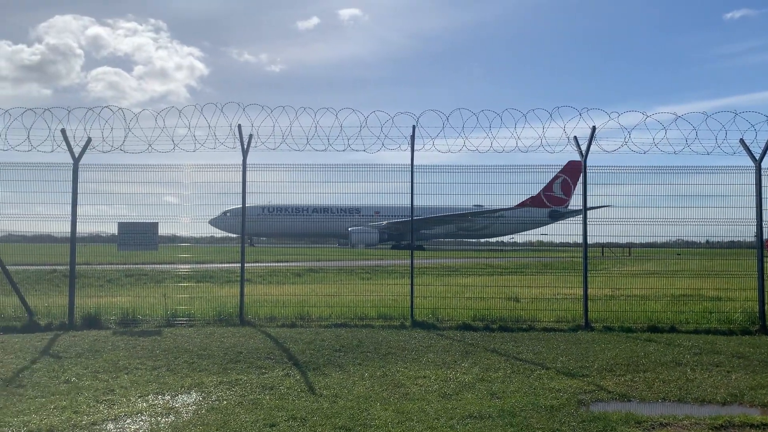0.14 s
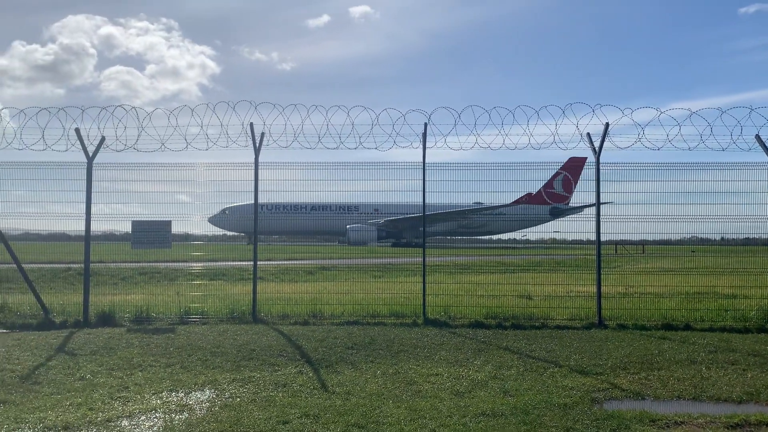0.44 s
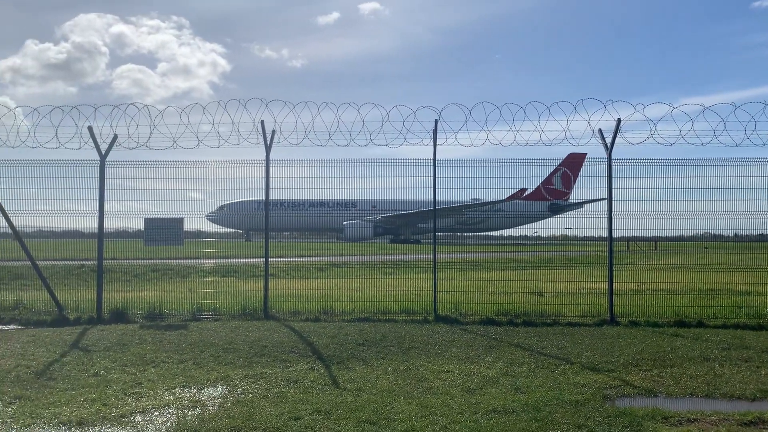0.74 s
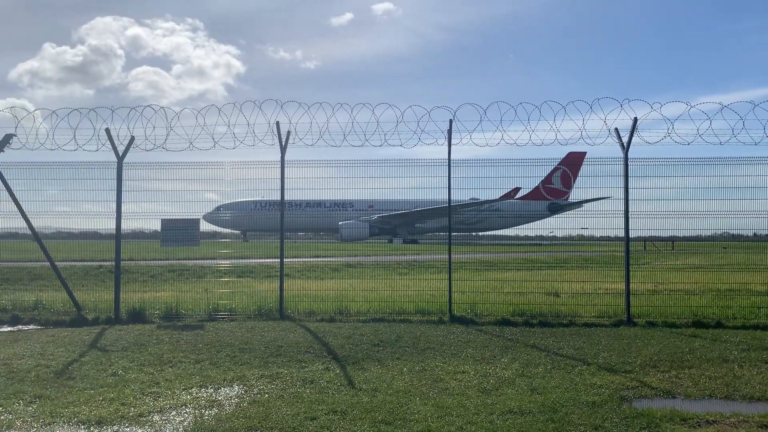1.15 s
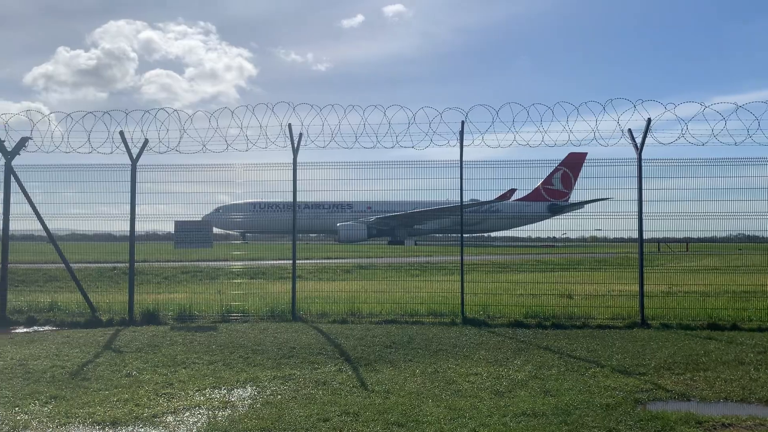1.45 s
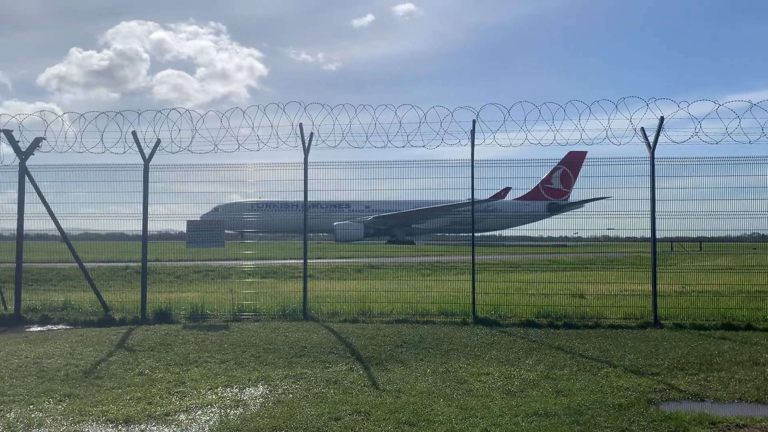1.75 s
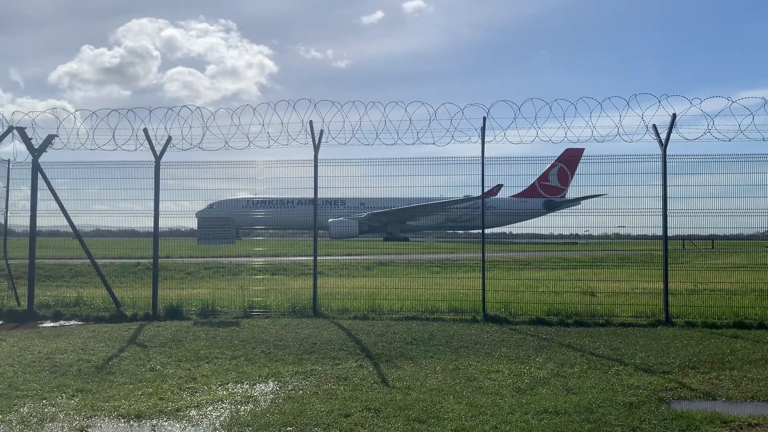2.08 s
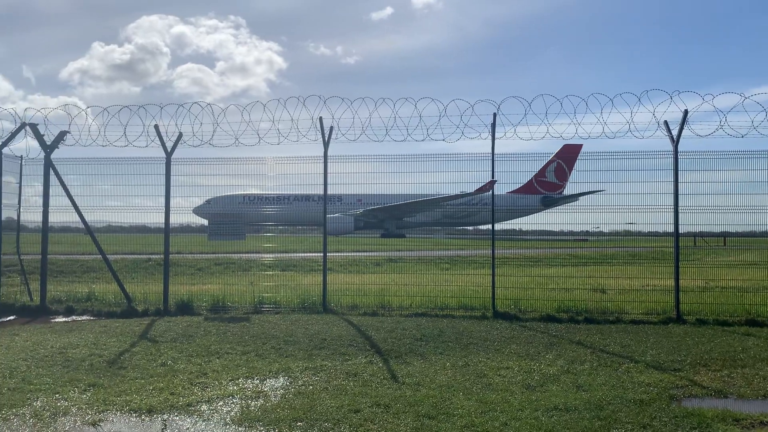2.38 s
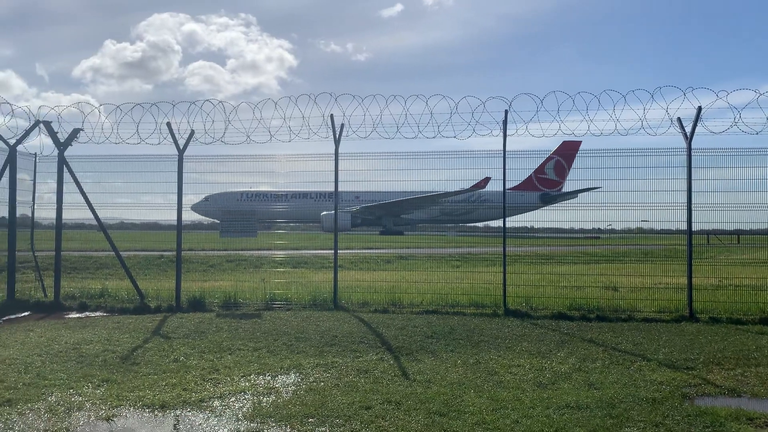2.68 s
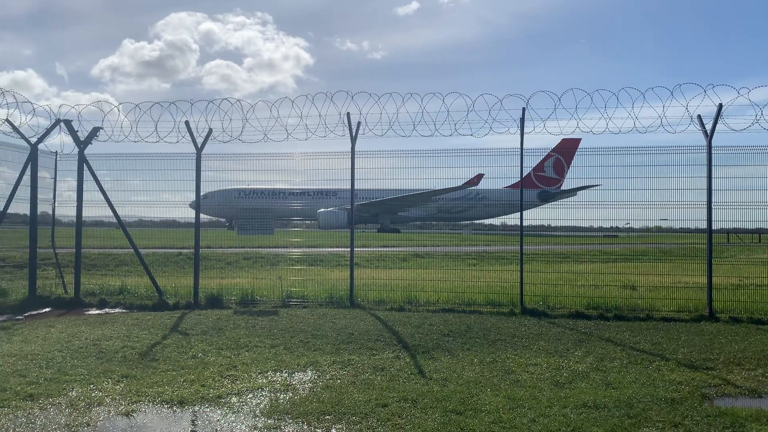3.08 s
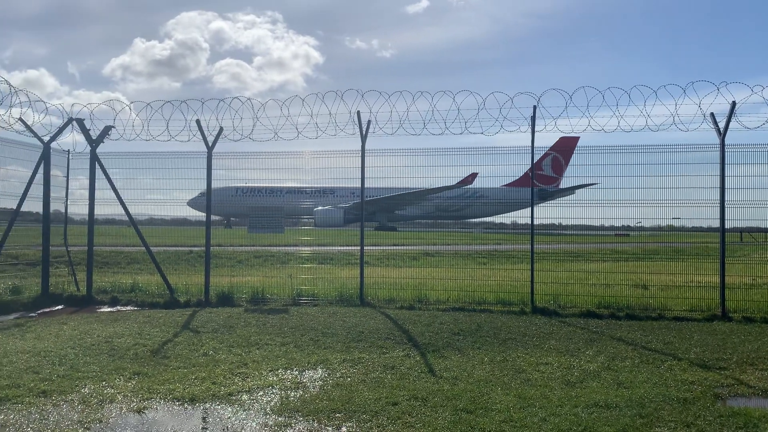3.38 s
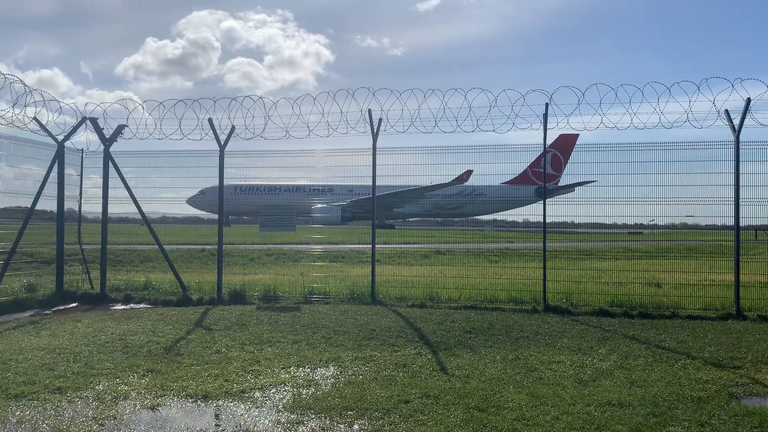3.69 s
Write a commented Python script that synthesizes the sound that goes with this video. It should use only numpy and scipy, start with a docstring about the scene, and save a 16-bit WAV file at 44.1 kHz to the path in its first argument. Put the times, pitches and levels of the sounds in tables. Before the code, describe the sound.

An airliner taxis across an open airfield, its distant jet engines giving a steady low rumble, a roar and thin wavering whines. Wind buffets the microphone in short puffs, growing busier toward the end as gusts hiss through grass.

```python
"""A windy airfield: an airliner taxis past at a distance, heard through two close microphone ports.
Its engines give a low exhaust rumble with drones, a mid jet roar and thin blade whines that fade
in and out in the moving air. Eddies buffet the ports in short puffs, flurries and low shoves.
Gusts hiss in the grass and the fence, most of all near the end."""
import sys
import numpy as np
from scipy import signal
from scipy.fft import rfft, irfft
from scipy.io import wavfile
from scipy.ndimage import uniform_filter1d

SR = 44100
rng = np.random.default_rng(int(sys.argv[2]) if len(sys.argv) > 2 else 0)


def waveform_to_disk(signal):
    """Save audio, clipped to [-1, 1], as 16-bit WAV at the path in sys.argv[1]."""
    frames = np.transpose(np.atleast_2d(signal))
    scaled = np.clip(frames, -1, 1) * 32767
    samples = np.round(scaled).astype(np.int16)
    wavfile.write(sys.argv[1], SR, samples)


N = 168903
T = np.arange(N) / SR

# Port pair. Each row: frequency in Hz, coherence, left lead in radians, left minus right in dB.
PORT_RESPONSE = [(170, 0.94, -1.5, -2.5), (332, 0.96, 1.62, 0.5), (520, 0.39, -1, -.5),
                 (930, 0.95, 0.77, -1.5), (1480, 0.9, 0.1, -1.7), (2720, 1, 1.12, -1.5),
                 (3170, .15, 1, 0.5), (4420, 0.66, 1.1, 0), (4760, 0.2, -3, -7), (5750, 0.9, -1.2, -1.5),
                 (7380, .72, -1.28, -3.5), (8380, 1, -3, 0.5), (11300, 0.6, -1, 0)]

# Noise spectra. Each row: frequency in Hz, relative density in dB.
WASH_SPECTRUM = [(300, -4), (600, -5), (740, -4), (830, 1), (900, -0.5), (1100, 0.5), (1500, -6),
                 (2600, -12), (3200, -21), (5000, -51.5)]
HISS_SPECTRUM = [(1500, -3), (3400, -6.5), (4450, 0), (4800, -3), (5150, 3.5), (5800, 3.5), (6800, -0.5),
                 (7400, 6), (7800, 2.5), (8180, 11.5), (8420, -23.5), (9300, -13.5), (10000, -11.5),
                 (11000, -42.5)]
GRASS_SPECTRUM = [(300, 11), (700, 2), (1500, 20), (3000, -22.5), (4500, 8.5), (5800, 12), (7000, -13),
                  (8300, -8), (10000, -39)]
BUFFET_SPECTRUM = [(100, -30), (200, -13.5), (300, 11), (420, -6.5), (600, -11), (900, -12), (2000, -50)]
FLURRY_SPECTRUM = [(120, -20), (230, 2), (330, 1), (450, -4.5), (560, -10.5), (720, -17.5), (1000, -23),
                   (2000, -56)]
RUMBLE_SPECTRUM = [(10, -45), (18, -36.5), (27, -24.5), (37, -16.5), (58, 1.5), (82, 0), (110, -4.5),
                   (124, -5), (138, -1), (162, 1.5), (190, -6), (280, -9.5), (325, -11.5), (380, -20.5),
                   (480, -36), (750, -45), (1500, -85)]
ROAR_SPECTRUM = [(200, -3.5), (500, -9), (740, -3.5), (830, -4.5), (900, -5.5), (1100, -3.5), (1400, -4.5),
                 (1720, 1), (1850, 2), (2050, 3), (2180, -1), (2450, -1.5), (2850, -1.5), (3050, -8),
                 (3300, -15.5), (4500, -18), (8000, -62.5)]

# Noise and tone envelopes. Each row: time in seconds, level in dB before any trim or fading.
WASH_DB = [(0, -59), (1.3, -47.5), (2.4, -42), (3.83, -41.5)]
HISS_DB = [(0.0, -54), (0.02, -57), (0.48, -57), (1.14, -52), (1.27, -55.5), (1.68, -57.5), (1.76, -55),
           (3.31, -52), (3.67, -49.5), (3.83, -49.5)]
BUFFET_DB = [(0, -34.5), (.8, -48.5), (1.3, -36.5), (2.3, -34), (2.8, -40.5), (3.35, -31.5), (3.65, -41),
             (3.83, -35)]
ROAR_DB = [(0, -34.5), (.17, -34.5), (.24, -33.5), (.6, -34.5), (.95, -35), (1.26, -35), (1.36, -36),
           (1.62, -37.5), (1.85, -36.5), (2.3, -36.5), (2.7, -36), (2.86, -38), (3, -37.5), (3.83, -38)]
UPPER_DRONE_DB = [(0, -44), (.14, -31), (.27, -50), (.5, -31.5), (.7, -41), (1.2, -35.5), (1.32, -38.5),
                  (1.47, -26), (1.58, -41), (2, -34.5), (2.2, -33), (2.4, -36.5), (2.68, -32.5), (3, -45.5),
                  (3.83, -34)]
FAN_DB = [(0, -49), (.07, -44), (.22, -52), (.35, -54.5), (.48, -51), (.6, -54), (.72, -49.5), (.82, -60),
          (.95, -56.5), (1.03, -53), (1.27, -50), (1.36, -53.5), (1.48, -50), (1.58, -61), (2.04, -57),
          (2.11, -47), (2.19, -57), (2.3, -51.5), (2.55, -56.5), (2.8, -57), (2.95, -62), (3.55, -66),
          (3.7, -57), (3.83, -58)]
FAN_RING_DB = [(0, -52), (.18, -45), (.27, -43), (.52, -46), (.6, -55), (.95, -46), (1.17, -46), (1.4, -58),
               (1.55, -44), (1.75, -55), (3.83, -58.5)]
TURBINE_DB = [(0, -63), (.8, -55), (1.7, -60.5), (2.3, -62), (3.35, -60), (3.83, -58)]

# Wind and whine swells. Each row: centre in seconds, sigma in seconds, crest level in dB.
GRASS_GUSTS = [(.71, .045, -41.5), (3.63, 0.048, -40.5), (3.79, 0.082, -42)]
EDDY_FLURRIES = [(.44, 0.029, -32), (2.54, .012, -28), (2.62, .012, -26), (2.838, 0.015, -22.5),
                 (3.122, 0.013, -25), (3.48, 0.0069, -23.5), (3.558, 0.01, -23), (3.615, 0.019, -21),
                 (3.69, 0.024, -27), (3.782, 0.0085, -28)]
TURBINE_WHINE_SWELLS = [(2.022, 0.028, -49), (2.202, .017, -48), (2.28, 0.021, -50), (2.421, 0.015, -46.5),
                        (2.544, 0.017, -47), (2.741, .022, -51.5), (2.882, .022, -47.5),
                        (2.999, 0.022, -49), (3.085, .021, -48.5), (3.19, 0.018, -50), (3.288, .018, -52),
                        (3.6, 0.022, -56), (3.747, 0.023, -49)]
# Large eddies. Each row: centre in seconds, sigma in seconds, crest level in dB, pitch in Hz.
LOW_SHOVES = [(.211, 0.011, -17, 89.9), (0.304, 0.0082, -22, 90), (.79, .025, -23.5, 70),
              (1.248, 0.0057, -17, 65), (2.552, 0.014, -18, 130), (2.644, 0.011, -16, 80),
              (2.825, 0.012, -15, 125), (2.905, 0.014, -17, 70), (2.959, 0.0079, -15.5, 105),
              (3.272, 0.01, -16.5, 60), (3.313, 0.011, -20.5, 55), (3.399, 0.024, -18.5, 140),
              (3.457, 0.0091, -13.5, 60), (3.535, 0.018, -17, 70), (3.646, 0.014, -19, 75),
              (3.717, 0.011, -16, 85)]
# Single eddies. Each row: peak time in seconds, peak in dB, starting pitch in Hz.
PORT_PUFFS = [(0.366, -14, 398), (.452, -22, 720), (.531, -24, 685), (0.767, -19, 575), (.785, -12.5, 327),
              (.867, -23, 704), (1.8508, -14, 987), (2.063, -15, 880), (2.611, -17, 590), (2.763, -23, 610),
              (3.14, -15.5, 510), (3.257, -17.5, 740), (3.622, -11, 448), (3.677, -19, 685)]
# Low engine drones. Each row: pitch in Hz, rms level in dB, fading in dB, wander as a share of pitch.
LOW_DRONES = [(81, -33, 3, .03), (101.4, -24.3, 2, .007)]
# Thin blade tones. Each row: pitch in Hz, start level in dB, end level in dB, left lead in radians.
BLADE_TONES = [(1529.5, -57, -53, .1), (1824, -47.5, -53.5, .5), (3228, -61.5, -70, -2),
               (4963, -68, -68, -2.2), (6278, -73, -72, -.9)]

HISS_TRIM_DB, ROAR_TRIM_DB, RUMBLE_DB = 7, 0.27, -19.5
PUFF_RISE_S, PUFF_SAG_S, PUFF_END_SHARE, PUFF_JITTER = .0035, .0038, 0.18, 0.16
UPPER_DRONE_HZ, FAN_HZ, FAN_RING_HZ, TURBINE_HZ = 310.5, 4062, 2235, 3645
LOW_CUT_HZ, MONO_BELOW_HZ, HIGH_CUT_HZ, FADE_S = 36.5, 327, 11300, .002


def amp(db):
    """Decibels to gain."""
    return 10 ** (np.asarray(db) / 20)


def unit(x):
    """Scales to rms 1."""
    return x / np.sqrt(np.mean(x ** 2) + 1e-20)


def curve(points):
    """Piecewise-linear curve in time."""
    return np.interp(T, *np.transpose(points))


def swells(table):
    """Gain curve: one Gaussian per row."""
    return sum(amp(db) * np.exp(-.5 * ((T - centre_s) / sigma_s) ** 2) for centre_s, sigma_s, db in table)


def lookup(points, hz, column=1):
    """Table column on a log-frequency axis."""
    table = np.transpose(points)
    return np.interp(np.log(hz + 1), np.log(table[0]), table[column])


def drift(rate_hz):
    """Slow random motion, soft-limited, rms 1."""
    hz = np.fft.rfftfreq(N, 1 / SR)
    slow = irfft(rfft(rng.standard_normal(N)) * (hz > 0) / (1 + (hz / rate_hz) ** 2), N)
    return unit(np.tanh(.5 * unit(slow)))


def air_noise(spectrum, patchy_db, size=1024, coherence_scale=1):
    """Coloured noise with drifting patches at the two ports, rms 1."""
    hz = np.fft.rfftfreq(size, 1 / SR)
    left_re, left_im, own_re, own_im, patches = rng.standard_normal((5, N * 4 // size + 6, len(hz)))
    patches = unit(uniform_filter1d(uniform_filter1d(patches, size=10, axis=0), size=7, axis=1))
    coherence = np.clip(lookup(PORT_RESPONSE, hz, column=1) * coherence_scale, -1, 1)
    lead_rad = lookup(PORT_RESPONSE, hz, column=2)
    lean = amp(lookup(PORT_RESPONSE, hz, column=3) / 2)
    left = left_re + 1j * left_im
    own = own_re + 1j * own_im
    right = (coherence * left + np.sqrt(1 - coherence ** 2) * own) * np.exp(-1j * lead_rad)
    frames = np.array([left * lean, right / lean]) * amp(lookup(spectrum, hz) + patchy_db * patches)
    _, noise = signal.istft(frames.transpose(0, 2, 1), nperseg=size, noverlap=size - size // 4)
    return unit(noise[:, :N])


def tone(hz, fade_db, fade_hz, wander, lead_rad=0, apart_db=0):
    """Wavering stereo sine that fades at random in moving air, rms 1."""
    phase = 2 * np.pi * np.cumsum(hz * (1 + wander * drift(fade_hz))) / SR
    common_db = fade_db * drift(fade_hz)
    ports = [amp(common_db + apart_db * drift(fade_hz)) * np.sin(phase - lag) for lag in (0, lead_rad)]
    return unit(np.array(ports))


def air_wash():
    """Rising wash of distant air."""
    return amp(curve(WASH_DB)) * air_noise(WASH_SPECTRUM, patchy_db=1.5)


def air_hiss():
    """High hiss of air, slowly rising."""
    return amp(curve(HISS_DB) + HISS_TRIM_DB) * air_noise(HISS_SPECTRUM, patchy_db=1.46)


def grass_gusts():
    """Gusts hiss through grass and fence."""
    return swells(GRASS_GUSTS) * air_noise(GRASS_SPECTRUM, patchy_db=2.5)


def buffet():
    """Lumpy turbulence at the ports."""
    lumps = amp(2.7 * drift(rate_hz=17))
    turbulence = air_noise(BUFFET_SPECTRUM, patchy_db=3.5, coherence_scale=0.87)
    return amp(curve(BUFFET_DB)) * unit(lumps * turbulence)


def flurries():
    """Ragged bursts of small eddies."""
    return swells(EDDY_FLURRIES) * air_noise(FLURRY_SPECTRUM, patchy_db=3.5, coherence_scale=0.63)


def shoves():
    """Large eddies rock the air at the microphone for a few uneven cycles."""
    uneven_s = np.cumsum(1 + .3 * drift(rate_hz=59)) / SR
    out = np.zeros(N)
    for centre_s, sigma_s, db, hz in LOW_SHOVES:
        phase = 2 * np.pi * (hz * uneven_s + rng.random())
        out += swells([(centre_s, sigma_s, db)]) * np.sqrt(2) * np.sin(phase)
    return out


def puffs():
    """Single eddies cross the ports: a few ragged, falling cycles, different at each port."""
    t = np.arange(SR // 20) / SR
    sag = PUFF_END_SHARE + (1 - PUFF_END_SHARE) * np.exp(-t / PUFF_SAG_S)
    envelope = (t / PUFF_RISE_S * np.exp(1 - t / PUFF_RISE_S)) ** 0.76
    out = np.zeros((2, N))
    for time_s, peak_db, hz in PORT_PUFFS:
        jitter = unit(uniform_filter1d(rng.standard_normal((2, len(t))), size=40, axis=1))
        pitch_hz = hz * sag * (1 + PUFF_JITTER * jitter)
        phase = 2 * np.pi * (np.cumsum(pitch_hz, axis=1) / SR + rng.random())
        start = round((time_s - PUFF_RISE_S / 2) * SR)
        out[:, start:start + len(t)] += amp(peak_db) * envelope * np.sin(phase)
    return out


def blade_whines():
    """Fan and turbine blade tones; the turbine comes through in swells."""
    fan = tone(FAN_HZ, fade_db=.9, fade_hz=14, wander=.0009, lead_rad=0.27, apart_db=2.5)
    turbine = tone(TURBINE_HZ, fade_db=1, fade_hz=14, wander=.0013, lead_rad=2.1, apart_db=1.5)
    ring = tone(FAN_RING_HZ, fade_db=1.5, fade_hz=6, wander=.002, lead_rad=.7, apart_db=2)
    out = amp(curve(FAN_DB)) * fan + amp(curve(FAN_RING_DB)) * ring
    out += (amp(curve(TURBINE_DB)) + swells(TURBINE_WHINE_SWELLS)) * turbine
    for hz, start_db, end_db, lead_rad in BLADE_TONES:
        blade = tone(hz, fade_db=1.0, fade_hz=11.3, wander=0.0016, lead_rad=lead_rad, apart_db=7.5)
        out += amp(np.linspace(start_db, end_db, N)) * blade
    return out


def jet_roar():
    """Mid roar; eases as the intakes turn away."""
    level_db = curve(ROAR_DB) + ROAR_TRIM_DB + 0.15 * drift(rate_hz=28)
    return amp(level_db) * air_noise(ROAR_SPECTRUM, patchy_db=1.0)


def engine_rumble():
    """Exhaust rumble, two low drones and an upper drone that comes and goes."""
    out = amp(RUMBLE_DB) * air_noise(RUMBLE_SPECTRUM, patchy_db=-0.1, size=4096)
    out += amp(curve(UPPER_DRONE_DB)) * tone(UPPER_DRONE_HZ, fade_db=4.0, fade_hz=14.3, wander=0.018)
    for hz, db, fade_db, wander in LOW_DRONES:
        out += amp(db) * tone(hz, fade_db, fade_hz=4.8, wander=wander)
    return out


def scene():
    """Distant airliner and air, plus nearby wind."""
    distant = engine_rumble() + jet_roar() + air_hiss() + blade_whines()
    wind = buffet() + puffs() + flurries() + shoves() + grass_gusts()
    return distant + wind + air_wash()


def record(dry):
    """Low cut, mono bass, end fades, high cut."""
    hz = np.fft.rfftfreq(N, 1 / SR) + 1
    mid = irfft(rfft(dry.mean(0)) / np.sqrt(1 + (LOW_CUT_HZ / hz) ** 8), N)
    side = irfft(rfft((dry[0] - dry[1]) / 2) / np.sqrt(1 + (MONO_BELOW_HZ / hz) ** 10), N)
    fade = np.minimum(np.minimum(T, T[::-1]) / FADE_S, 1)
    stereo = np.array([mid + side, mid - side]) * fade
    lowpass = signal.firwin(511, HIGH_CUT_HZ, window=("kaiser", 9), fs=SR)
    return signal.oaconvolve(stereo, lowpass[None], "same")


dry = scene()
out = record(dry)
waveform_to_disk(out)
```